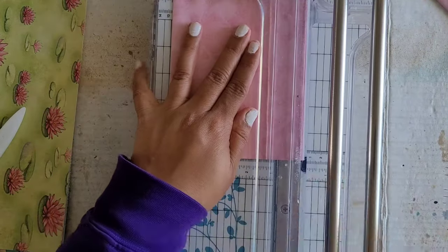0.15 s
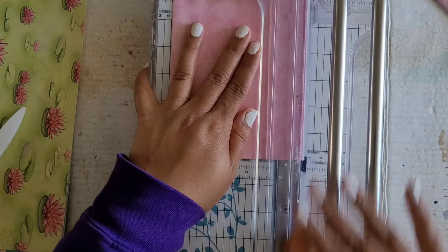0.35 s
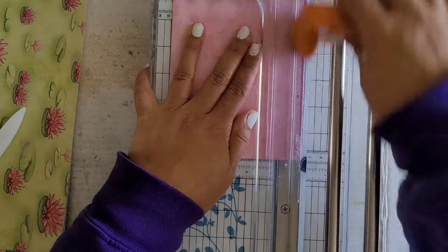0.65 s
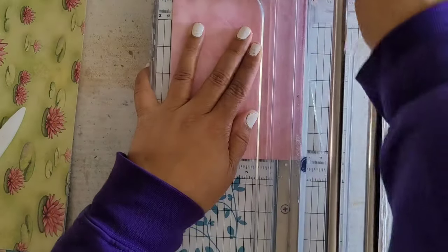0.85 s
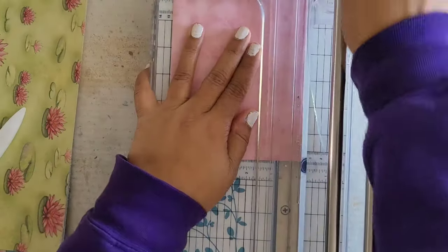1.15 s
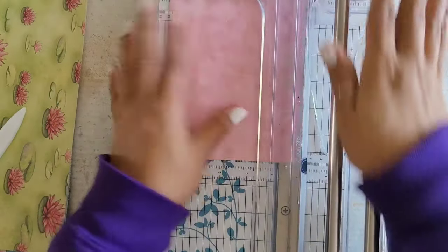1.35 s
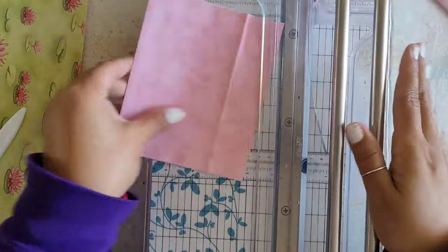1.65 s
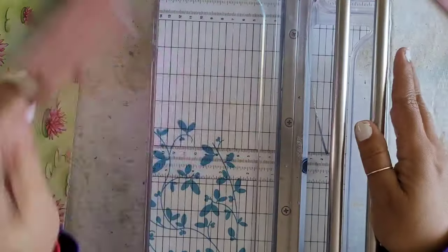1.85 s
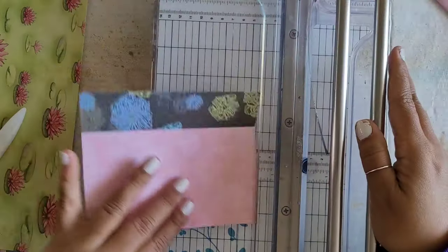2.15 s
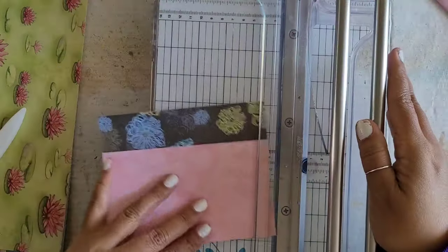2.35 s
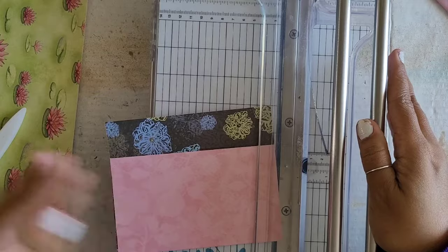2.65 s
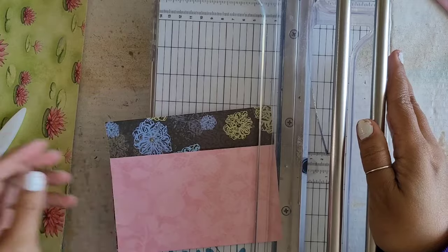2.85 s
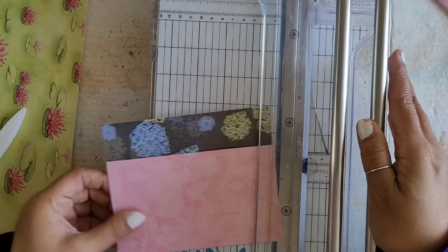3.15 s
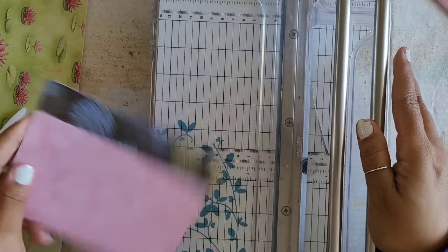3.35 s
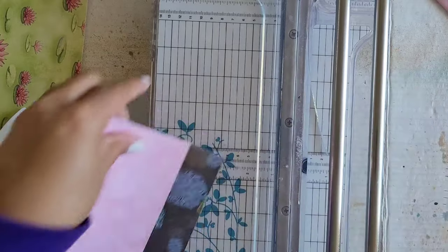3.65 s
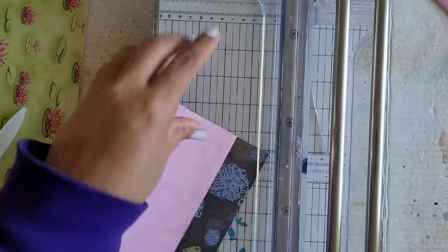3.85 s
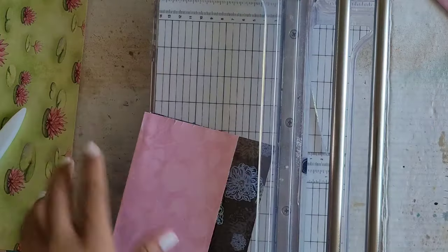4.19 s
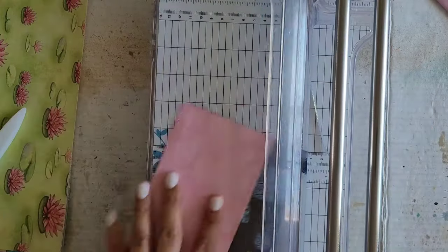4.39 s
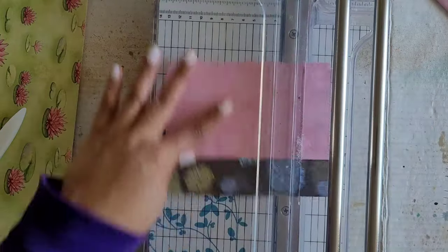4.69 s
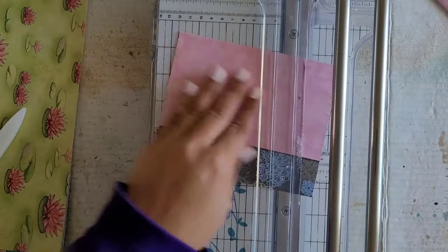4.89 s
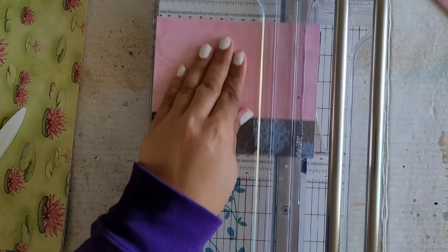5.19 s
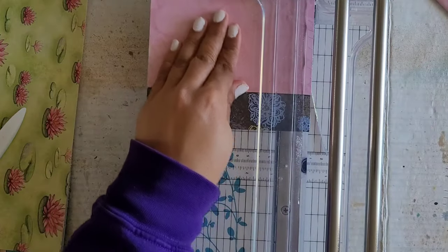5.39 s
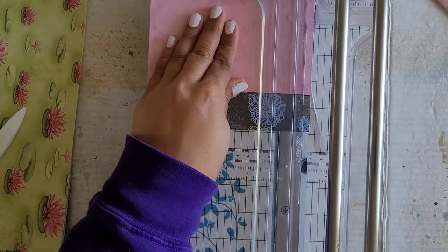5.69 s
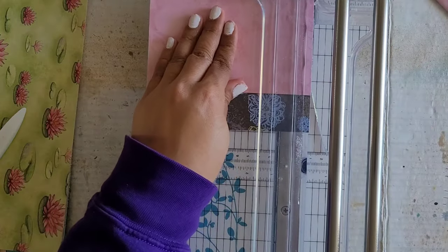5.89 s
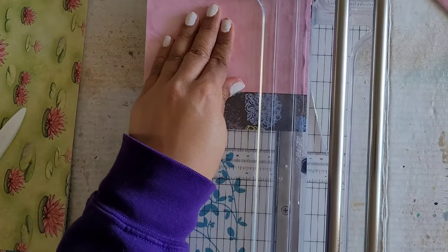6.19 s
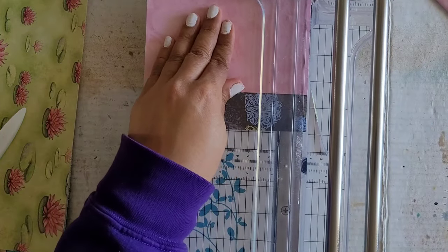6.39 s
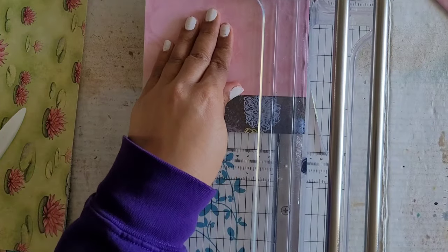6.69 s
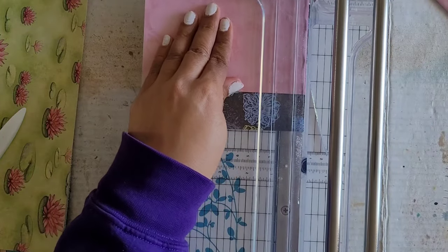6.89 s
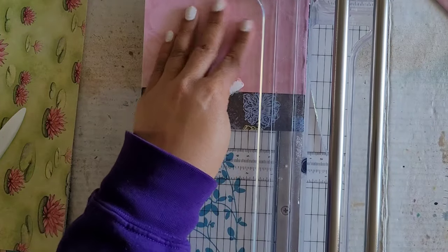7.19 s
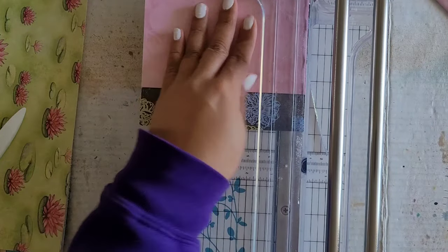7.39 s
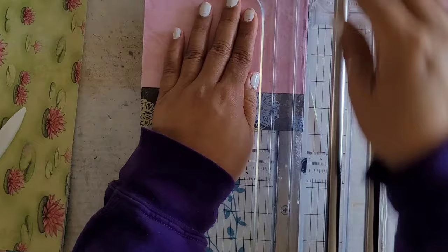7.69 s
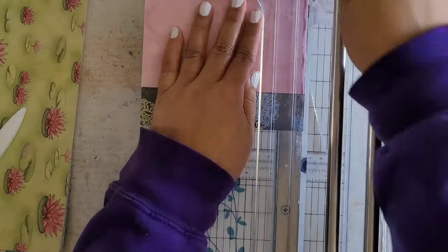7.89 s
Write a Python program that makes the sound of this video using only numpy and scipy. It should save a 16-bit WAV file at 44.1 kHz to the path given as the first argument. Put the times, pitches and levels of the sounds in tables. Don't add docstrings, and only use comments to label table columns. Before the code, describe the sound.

Close on a craft table in a quiet room, a plastic cutter carriage clicks into place, rubs roughly along its rail and knocks the end stop. A stiff sheet then hisses, taps and snaps as hands turn it. Midway a plastic guide bar slaps down loudly with a brief chatter. Soft sliding and sparse ticks follow over a faint appliance hum.

```python
import sys
import numpy as np
from scipy import signal
from scipy.fft import rfft, irfft, next_fast_len
from scipy.io import wavfile

SR = 44100
rng = np.random.default_rng(int(sys.argv[2]) if len(sys.argv) > 2 else 0)


def int16_out(signal):
    q = np.round(np.clip(np.atleast_2d(signal).T, -1, 1) * 32767)
    wavfile.write(sys.argv[1], SR, q.astype(np.int16))


def gain_from_decibels(decibels):
    exponent = np.asarray(decibels, float) / 20
    return 10 ** exponent


N = 354563
FFT_SIZE = next_fast_len(N)
BINS_HZ = np.maximum(np.fft.rfftfreq(FFT_SIZE, 1 / SR), 1)

# pitch in Hz, width in Hz, level in dB.
BOARD_MODES = [(300, 13, -8), (496.8, 98, -2), (650, 55, 0), (860, 130, -6.5)]
# pitch in Hz, width in Hz, level in dB.
CRACK_MODES = [(3786, 390, 6.5), (5400, 1500, -2.5), (6900, 880, -0.5), (8850, 950, -2), (11300, 990, -3.5),
               (12800, 7500, -16.5)]
# pitch in Hz, likeness (1 is the same, 0 is unrelated).
LIKENESS = [(30, .93), (60, 1), (250, 0.85), (600, 0.83), (1200, 0.33), (3000, 0.16), (8000, -0.091),
            (14000, -0.05)]
# pitch in Hz, difference in dB.
LEFT_LEAN = [(200, 0), (1000, -0.5), (3000, 0.5), (10000, -1.5)]


def rms_one(x):
    return x / np.sqrt(np.mean(x ** 2) + 1e-20)


def in_time(rows):
    s, *columns = np.transpose(rows)
    return [np.interp(np.arange(N) / SR, s, c, left=-140, right=-140) for c in columns]


def at_hz(points, hz):
    table_hz, values = np.transpose(points)
    return np.interp(np.log(hz), np.log(table_hz), values)


def drift(rate):
    r = np.exp(-80 * np.pi * rate / SR)
    slow = signal.lfilter([1], [1, -2 * r, r * r], rng.standard_normal(N // 40 + 2002))[2000:]
    return np.interp(np.arange(N) / 40, np.arange(len(slow)), rms_one(slow - slow.mean()))


def resonate(x, modes):
    out = 0
    for k, (hz, width, db) in enumerate(modes):
        r = np.exp(-np.pi * width / SR)
        pole = [1, -2 * r * np.cos(2 * np.pi * hz / SR), r * r]
        ring = signal.lfilter([(1 - r * r) / 2, 0, (r * r - 1) / 2], pole, x)
        out = out + (-1) ** k * gain_from_decibels(db) * ring
    return out


def grit(per_s, spread_db, clump_db):
    sizes = gain_from_decibels(spread_db * np.minimum(rng.exponential(1, (2, N)), 4)) * rng.choice([-1, 1], (2, N))
    happens = rng.random((2, N)) < per_s / SR
    return sizes * happens * gain_from_decibels(clump_db * drift(21)) + 1e-9


def tinted(pair, spectrum, low_hz, high_hz):
    skirt = 1 / np.sqrt((1 + (low_hz / BINS_HZ) ** 6) * (1 + (BINS_HZ / high_hz) ** 6))
    coloured = rfft(pair, FFT_SIZE) * gain_from_decibels(at_hz(spectrum, BINS_HZ)) * skirt
    return rms_one(irfft(coloured, FFT_SIZE)[:, :N])


def likeness_and_lean(hz):
    return np.clip(at_hz(LIKENESS, hz), -1, 1), at_hz(LEFT_LEAN, hz) / 2


def spread(pair):
    alike, lean = likeness_and_lean(BINS_HZ)
    mid, side = rfft(pair, FFT_SIZE) * np.sqrt([1 + alike, 1 - alike])
    return irfft([(mid + side) * gain_from_decibels(lean), (mid - side) * gain_from_decibels(-lean)], FFT_SIZE)[:, :N] / np.sqrt(2)


def strike(modes, rise_s, t60, noise):
    t = np.arange(noise.shape[1]) / SR
    force = (1 - np.exp(-t / rise_s)) ** 2 * (gain_from_decibels(-60 * t / t60) + 0.82 * np.exp(-t / 0.001396))
    rings = resonate(noise * force, modes)
    return rings / np.abs(rings).max(axis=1, keepdims=True)


def add(out, s, sound):
    i = round(s * SR)
    out[:, i:i + sound.shape[1]] += sound[:, :N - i]


def background():
    # pitch in Hz, level in dB per Hz.
    air_colour = [(20, -31.5), (40, -8), (55, 2), (80, -4.5), (200, 2), (310, -8.5), (420, -9.5),
                  (630, -24.5), (1350, -20.5), (1600, -44.5), (2500, -50.5), (3200, -34.5), (5000, -52),
                  (9000, -70)]
    # time in seconds, level in dB.
    air_fade = [(0, 3), (1.5, 2), (3, -2.5), (8.04, -2)]
    # pitch in Hz, width in Hz, level in dB (rms).
    hum_tones = [(79.94, 6.5, -60.5), (119.7, 0.67, -61), (160, 6.8, -71), (3200, 430, -91),
                 (6360, 270, -85.5)]
    whine_hz, whine_db = 1125, -70.5
    air = gain_from_decibels(-54 + in_time(air_fade)[0]) * tinted(rng.standard_normal((2, N)), air_colour, 7.9, 17000)
    hum = 0
    for hz, width, db in hum_tones:
        hum = hum + gain_from_decibels(db) * rms_one(resonate(rng.standard_normal((2, N)), [(hz, width, 0)]))
    turn = 2 * np.pi * np.cumsum(whine_hz + 1.5 * drift(10.0)) / SR
    whine = np.sqrt(2) * gain_from_decibels(whine_db + 1.6 * drift(6)) * np.array([np.sin(turn), np.cos(turn)])
    return air + hum + whine


def bands(pair, size):
    limits_hz = 28 * 2 ** np.arange(0, 9.3, 0.4)
    for low, high in zip(limits_hz, limits_hz[1:]):
        hz = np.sqrt(low * high)
        band_pass = signal.butter(2, [low, high], "band", fs=SR, output="sos")
        mid, side = signal.sosfilt(band_pass, pair())[:, -size:]
        alike, lean = likeness_and_lean(hz)
        both = np.sqrt(1 + alike) * mid + np.sqrt(1 - alike) * side * [[1], [-1]]
        yield hz, both * gain_from_decibels(np.array([[lean], [-lean]]))


def room(x):
    # pitch in Hz, seconds to fall 60 dB.
    decay = [(125, 0.37), (600, 0.21), (2500, 0.36), (5000, 0.21), (12000, 0.39)]
    # pitch in Hz, level in dB.
    tilt = [(300, 0), (1500, 0), (5000, -3), (8500, -10), (12000, -14)]
    t = np.arange(SR // 2) / SR
    tail = 0
    for hz, band in bands(lambda: rng.standard_normal((2, SR)), SR // 2):
        tail = tail + band * gain_from_decibels(at_hz(tilt, hz) - 60 * t / at_hz(decay, hz))
    tail = tail * (1 - np.exp(-t / 0.0018))
    tail = tail / np.sqrt((tail ** 2).sum(axis=1).mean())
    return signal.fftconvolve(x[None], tail, axes=1)[:, :N]


def moves(rows, rise_db_per_s, fall_db_per_s):
    t, out = np.arange(0, N, 32) / SR, 0
    for s, hold_s, db, drag_db, board_db in rows:
        shape_db = -rise_db_per_s * np.maximum(s - t, 0) - fall_db_per_s * np.maximum(t - s - hold_s, 0)
        out = out + gain_from_decibels(shape_db + db + np.array([[0], [drag_db], [board_db]])) ** 2
    return np.repeat(out, 32, axis=1)[:, :N]


def paper():
    # start in seconds, hold in seconds, hiss in dB, drag and board in dB above hiss.
    slow_slides = [(1.45, 0.14, -59, 6.5, 2.5), (2.27, 0.14, -66, 6.5, -8), (2.45, 0.15, -58, 3, -7),
                   (2.55, 0.15, -64, -14, -18), (2.95, 0.41, -100, 28.5, 23.5), (3.51, 0.1, -65, 6, 2),
                   (3.91, 0.021, -65.5, -1, 2), (4.07, 0.13, -68.5, -7, 7.5), (4.24, 0.021, -90, 20, 20),
                   (4.7, 0.21, -49, -7, -13.5), (4.88, 0.078, -60.5, 26, -11.5), (5.22, 0.31, -59.5, 6, -4),
                   (6.06, .015, -76, 9, 6), (7.68, 0.11, -79.5, 18, -6), (7.84, 0.13, -74, 11.5, 11)]
    # start in seconds, hold in seconds, hiss in dB, drag and board in dB above hiss.
    quick_jerks = [(1.33, 0.06, -67, 11, 16), (1.63, 0.13, -66.5, 12.5, 7.5), (1.73, 0.15, -56, -10, 2),
                   (1.9, 0.064, -54, -22, -18), (1.99, 0.1, -60.5, -2, -18), (3.25, 0.017, -72, -8, 4),
                   (3.31, 0.066, -61.5, 4.5, 3), (3.42, 0.019, -64, -22, -10), (3.64, 0.082, -71, -5, -3),
                   (3.72, 0.083, -61, -25, -2), (4.435, 0.034, -52.5, 2.5, -1), (4.49, 0.047, -59, 6, -7),
                   (4.55, 0.08, -46.5, 1, -15), (5.1, 0.026, -59.5, 7, 8), (5.705, 0.016, -86, 11, 21.5),
                   (6.25, 0.013, -68.5, 8.5, -7.5), (6.76, 0.013, -74, 13.5, 5.5),
                   (6.92, 0.0077, -63, 3.5, -1), (7.1, .012, -84, 9, 14.5), (7.3, 0.059, -61.5, 0, -16),
                   (7.5, 0.035, -54, -9.5, -15), (7.56, 0.039, -61, 8, 10.5)]
    # hiss, drag and board in dB.
    resting_db = [-104, -91, -69.5]
    bend_zones = [1700, 2400, 3300, 4400, 5900, 7800, 10500, 14000]
    # pitch in Hz, level in dB per Hz.
    sheet_colour = [(710, -32.5), (1200, 2.5), (1850, -5), (2680, -8.5), (2830, -5.5), (3590, -7.5),
                    (6440, -10.5), (8000, -11), (11900, -10), (15200, -15.5), (16000, -16.5)]
    power = moves(slow_slides, rise_db_per_s=135.5, fall_db_per_s=214.5)
    power = power + moves(quick_jerks, rise_db_per_s=748.5, fall_db_per_s=327.5)
    handled = np.arange(N) / SR > quick_jerks[0][0]
    hiss_gain, drag_gain, board_gain = np.sqrt(power + handled * gain_from_decibels(resting_db)[:, None] ** 2)
    catches = grit(6000, spread_db=1.0, clump_db=0.8)
    fibres = 0
    for hz in bend_zones:
        fibres = fibres + gain_from_decibels(2.5 * drift(18)) * resonate(catches, [(hz, hz * 0.3, 0)]) / np.sqrt(hz)
    hiss = hiss_gain * gain_from_decibels(-0.17) * tinted(fibres, sheet_colour, 4100, 16500)
    drag = drag_gain * gain_from_decibels(-9.5) * tinted(fibres, sheet_colour, 2800, 4500)
    bumps = grit(900, spread_db=3.5, clump_db=4.0)
    return hiss + drag + board_gain * gain_from_decibels(-1.5) * rms_one(resonate(bumps, BOARD_MODES))


def snaps():
    # time in seconds, peak in dB, pitch in Hz.
    kinks = [(1.314, -46, 4930), (1.3323, -40, 4140), (1.365, -41, 1540), (1.443, -37, 3800),
             (1.556, -35, 2700), (1.7145, -26, 2500), (1.7902, -38, 6400), (1.8127, -40, 2500),
             (1.9394, -41, 4800), (1.9633, -37.5, 3000), (3.3136, -66, 3500), (3.36, -34.5, 4080),
             (3.3689, -42, 4100), (3.5021, -44, 3000), (3.547, -44, 2800), (3.5929, -50, 2560),
             (3.7574, -46, 2000), (4.1847, -23.5, 3670), (4.425, -36, 4000), (4.5473, -40, 4020),
             (5.103, -32, 2750), (5.2085, -56, 4000), (5.461, -42, 3000), (6.246, -56, 4000),
             (6.914, -48.5, 4020), (7.284, -51.5, 4020), (7.2996, -53, 4040), (7.4748, -48, 3200),
             (7.519, -50, 2800), (7.588, -35, 2810), (7.608, -49, 3450), (7.9376, -48.5, 4300),
             (7.9502, -46, 2500), (7.9611, -37, 2187), (7.9855, -44, 3100), (0.0211, -36.5, 2340),
             (0.1131, -44, 2500), (0.137, -43, 2970), (0.2014, -38, 5000), (0.2206, -32, 1600),
             (0.3958, -27, 1400), (0.6634, -18, 1990), (2.1389, -31, 890), (2.437, -46, 5500),
             (2.566, -27.5, 6100), (2.575, -26.5, 2960), (4.8402, -14.5, 800), (5.125, -50, 2800),
             (5.5185, -37, 1200), (5.705, -56, 1397)]
    buzz_db, buzz_t60_s = -5, 0.012
    out, t = np.zeros((2, N)), np.arange(SR // 30) / SR
    for s, db, hz in kinks:
        noise = rng.standard_normal((2, len(t)))
        kink = (t == 0) * np.array([[-1], [0.4 * noise[1, 1]]])
        buzz = gain_from_decibels(buzz_db - 60 * t / buzz_t60_s) * noise
        rings = resonate(kink, [(hz * 0.67, hz * 1.2, 0)])
        rings = rings + resonate(buzz, [(hz, hz * 0.4, 0), (hz * 0.5, hz * 0.5, -4.0)])
        add(out, s, gain_from_decibels(db) * rings / np.abs(rings[0]).max())
    return out


def taps(touches, kind, middle_modes, bright_modes):
    knock_above_db, middling_t60_s, shorter_per_db = kind
    out = np.zeros((2, N))
    for s, db, hz, hardness_db in touches:
        noise = rng.standard_normal((3, 2, SR // 8))
        knock_db = knock_above_db + 0.47 * hardness_db
        t60 = middling_t60_s * gain_from_decibels(-shorter_per_db * (db + 40))
        rise_s = 0.0003 * gain_from_decibels(-0.52 * hardness_db)
        dull_noise = signal.lfilter(*signal.butter(2, hz * 1.6, fs=SR), noise[0])
        thud_modes = [(hz, 130, 0), (hz * 1.3, 220, -6), (hz * 0.68, 120, -7)]
        thud = strike(thud_modes, rise_s, t60 * 0.76, dull_noise)
        knock = strike(middle_modes, rise_s * 0.84, t60 * 1.13, noise[1])
        crack = strike(bright_modes, 0.0002, t60 * 0.3, noise[2])
        touch = thud + gain_from_decibels(knock_db + 3) * knock + gain_from_decibels(hardness_db + 1.5) * crack
        add(out, s - 0.001, gain_from_decibels(db + 1.0) * touch)
    return out


def hands():
    # pitch in Hz, width in Hz, level in dB.
    knock_modes = [(1187, 270, 7), (2207, 430, 1.5), (2610, 1170, -4.5), (3240, 210, -1)]
    # time in seconds, thud in dB, thud pitch in Hz, hardness in dB.
    finger_pads = [(1.752, -38, 590, -14), (2.035, -40.5, 600, 1), (2.294, -33.5, 623, -43),
                   (2.566, -39.5, 517, 10), (2.574, -23.5, 610, -8), (3.24, -50, 261, -4.5),
                   (3.374, -37, 600, -21), (3.648, -44.5, 510, -11), (6.277, -40, 651, -19.5),
                   (7.086, -51, 597, -33), (7.551, -43, 800, -15)]
    # time in seconds, thud in dB, thud pitch in Hz, hardness in dB.
    paper_edges = [(1.324, -41.5, 651, -6), (1.441, -42, 573, -1), (1.6, -45.5, 567, -8),
                   (1.844, -46, 550, -25), (1.892, -31.5, 660, -28), (1.962, -36, 616, -2),
                   (2.137, -28.5, 284, -15), (2.724, -41.5, 710, 2), (3.591, -31, 770, -19),
                   (4.113, -50, 470, -16), (4.178, -45.5, 250, 3.5), (4.424, -49, 660, 5),
                   (4.8, -37, 596, -23.5), (5.455, -70, 654, 22), (5.96, -44, 568, -2),
                   (6.456, -41, 547, 1), (6.934, -41.5, 552, -14), (7.455, -52, 682, -8.5),
                   (7.505, -40, 590, -37)]
    # time in seconds, thud in dB, thud pitch in Hz, hardness in dB.
    fingernails = [(1.384, -45, 587, -19), (1.417, -40, 520, -35), (1.553, -53.5, 250, -25),
                   (1.695, -62, 538, 16), (1.711, -36.5, 1170, -14.5), (1.792, -39.5, 620, -18),
                   (1.814, -46, 580, -9), (3.762, -48, 650, -41), (4.032, -49.5, 1520, -24),
                   (4.036, -33, 580, -48), (4.181, -35.5, 645, -29), (4.54, -47, 563, -19),
                   (5.112, -39.5, 650, -34), (5.517, -30.5, 650, -31.5), (7.588, -42, 1270, -23),
                   (7.594, -43.5, 1310, -11)]
    # time in seconds, thud in
    # dB, thud pitch in Hz, hardness in dB.
    flat_hand = [(2.138, -27.5, 680, -9.5), (2.147, -36, 404, -55), (2.579, -34, 830, -16),
                 (3.368, -41, 926, -3.5), (3.592, -39.5, 360, -13), (4.82, -28.5, 680, -50.5),
                 (6.938, -44, 954, -22)]
    out = taps(finger_pads, (-5, 0.056, 0.52), knock_modes, CRACK_MODES)
    out += taps(paper_edges, (-0.6, 0.049, 0.92), knock_modes, CRACK_MODES)
    out += taps(fingernails, (7, 0.034, 0.79), knock_modes, CRACK_MODES)
    out += taps(flat_hand, (-0.95, 0.068, 0.04886), knock_modes, CRACK_MODES)
    return out


def guide_bar():
    # time in seconds, blow in dB, brightness in dB, fall time in seconds.
    blows = [
        (4.8347, -7, 1.5, 0.014),
        (4.8362, -9, -8, 0.0036),
        (4.8408, -11, -12, 0.017),
        (4.848, -14.5, -10, 0.058),
        (4.8547, -16, -7, 0.29),
        (4.872, -15, -8, 0.04),
    ]
    # pitch in Hz, width in Hz, level in dB.
    bar_modes = [(250, 120, -2.5), (474, 140, -1.5), (651, 88, 9.5), (800, 60, 11.5), (1200, 200, 2),
                 (1870, 470, 0.5), (2670, 4500, -6)]
    out = np.zeros((2, N))
    for s, db, bright_db, t60 in blows:
        noise = rng.standard_normal((2, 2, SR // 4))
        body = strike(bar_modes, 0.00074, t60, noise[0])
        crack = strike(CRACK_MODES, 0.00081, t60 * 0.58, noise[1])
        add(out, s - 0.001, gain_from_decibels(db) * (body + gain_from_decibels(bright_db) * crack))
    mid, side = out
    return np.array([mid, 0.5 * side - 0.35 * mid])


def carriage_clicks():
    # time in seconds, thud in dB, thud pitch in Hz, hardness in dB.
    clicks = [
        (0.021, -63, 250, -4),
        (0.113, -51, 715, -19.5),
        (0.139, -41.5, 650, -14),
        (0.202, -37, 582, -17),
        (0.311, -25, 530, -11.5),
        (0.398, -44.5, 675, 2),
        (0.968, -23, 665, 0),
        (1.096, -26.5, 680, 6.5),
        (7.95, -67, 300, 6),
        (7.961, -52, 265.6, -11),
    ]
    # pitch in Hz, width in Hz, level in dB.
    seat_modes = [(1354, 270, 2), (1596, 240, -2.5), (1810, 44, 1.5), (2245, 77, -20), (2860, 670, -16)]
    # pitch in Hz, width in Hz, level in dB.
    latch_modes = [(3064, 460, -14), (4270, 340, 6.5), (5360, 130, 3.5), (6330, 860, -1), (8800, 1800, -13),
                   (12000, 1100, -12)]
    return taps(clicks, (4.06, 0.045, 0.018), seat_modes, latch_modes)


def jolts():
    # time in seconds, then rail, holder and board in dB above the steady rub.
    releases = [(0.41, -3, -4, -9), (0.434, -14.5, 7, -9), (0.491, 10, -1.5, -9), (0.508, 4, 9, -13),
                (0.53, 8, -2, -10), (0.555, 4, 5, -10.5), (0.583, -1, 3, -6.5), (0.6, -4, 5, -3.5),
                (0.638, -2, -7.5, 0), (0.657, 8, -3, -10), (0.697, 6, 6, 12.5), (0.715, -4, -6, -2),
                (0.762, 10, -11, 13.5), (0.784, -4, -9, -3), (0.811, 7.5, -3.5, -13.5), (0.852, 1, -1, -1),
                (0.26, 10, -3, -6), (0.284, 2, -1, -6), (0.325, 2, -9, 5), (0.982, -9, 7, -1),
                (1.048, 9, -16, -11), (1.108, -3, 9, 15), (7.957, -5, 10, -11), (7.985, 0, 1, -9),
                (8.02, 2, -5, -9)]
    t, out = np.arange(SR // 8) / SR, np.ones((4, N))
    shape = (1 - np.exp(-t / 0.0052)) * gain_from_decibels(-60 * t / 0.068)
    for s, rail_db, holder_db, board_db in releases:
        blade_db = holder_db - 3.5
        add(out, s - 0.001, gain_from_decibels(np.array([[rail_db], [holder_db], [board_db], [blade_db]])) * shape)
    return out


def shift_pitch(pair, ratio):
    place = np.cumsum(ratio) % (N - 1)
    return np.array([np.interp(place, np.arange(N), x) for x in pair])


def carriage():
    # pitch in Hz, width in Hz, level in dB.
    rail_modes = [(1060, 83, 1), (1206, 410, 3), (1434, 160, 8), (1828, 130, -1), (2330, 650, -10)]
    # pitch in Hz, width in Hz, level in dB.
    holder_modes = [(2742, 350, -4.5), (3020, 470, -0.5), (3850, 670, 3.5), (4200, 500, 2),
                    (5013, 360, -7.5)]
    # pitch in Hz, width in Hz, level in dB.
    blade_modes = [(5230, 800, -4.5), (6540, 700, -1), (7300, 1300, -1.5), (9200, 3600, -1.5),
                   (12020, 10000, -5.5), (14700, 1700, -7.5)]
    # time in seconds, speed as dB, pressure on the board in dB.
    seating = [(0.0, -68, -21), (0.11, -65, -7), (0.14, -45.5, 5), (0.17, -55.5, 2), (0.23, -50, -2),
               (0.282, -42.5, -1.5), (0.38, -44.5, -5), (0.405, -36, -11)]
    # time in seconds, speed as dB, pressure on the board in dB.
    cut = [(0.443, -31.5, -11), (0.477, -37.5, -13.5), (0.501, -33, -20), (0.575, -31.5, -11.5),
           (0.593, -31.5, 2.5), (0.755, -35.5, -3), (0.78, -40, 5.5), (0.849, -34.5, 1), (0.885, -46, -0.5)]
    # time in seconds, speed as dB, pressure on the board in dB.
    coast = [(0.93, -46, 1), (1.03, -48, 0), (1.07, -43.5, -15), (1.159, -62, -8), (1.22, -73, -8),
             (1.3, -58.5, -18)]
    # time in seconds, speed as dB, pressure on the board in dB.
    restart = [(7.94, -81, -22), (7.955, -66.5, -34), (7.99, -59.5, -33), (8.04, -66, -35)]
    # time in seconds, rail and holder pitch ratio.
    travel = [(0.4, 1, 1.04), (0.49, 0.94, 1.04), (0.575, 1.11, 1.0), (0.63, 1.01, .95),
              (0.673, 1.07, 0.87), (0.722, .93, 1.04), (0.789, .84, .95), (0.849, 0.97, 0.99),
              (0.919, 1.02, .9)]
    # level in dB above speed, share of the pressure.
    answers = [
        (0.5, 0.08),
        (-1.5, -0.12),
        (-1, 0.98),
        (-2, 0.088),
    ]
    catches = grit(3000, spread_db=1.5, clump_db=0.14)
    parts = []
    for modes in (rail_modes, holder_modes, BOARD_MODES, blade_modes):
        parts.append(resonate(catches * rng.choice([-1, 1], N), modes))
    s, *ratios = np.transpose(travel)
    for k, ratio in enumerate(ratios):
        parts[k] = shift_pitch(parts[k], np.interp(np.arange(N) / SR, s, ratio))
    speed_db, pressure_db = np.maximum(in_time(seating + cut + coast), in_time(restart))
    out = 0
    for (db, share), part, jolt in zip(answers, parts, jolts()):
        rocking_db = 1.33 * drift(25)
        gain = gain_from_decibels(speed_db + db - 4.5 + share * pressure_db + rocking_db)
        out = out + gain * jolt * rms_one(part)
    return out


def scene():
    air = background()
    rubbing = paper() + carriage()
    touches = snaps() + hands() + carriage_clicks()
    blows = touches * [[1], [0.6]] + guide_bar()
    echoes = gain_from_decibels(-13) * room(blows[0] + 0.76 * rubbing[0])
    return spread(blows + rubbing + air) + echoes


def band_limit(x):
    return signal.sosfilt(signal.butter(12, 16640, fs=SR, output="sos"), x)


def record(dry):
    # pitch in Hz, level in dB.
    mic_colour = [(2000, 1), (3700, 1.5), (5200, -0.5), (6500, 4.5), (7600, -2), (9200, -1.5), (12000, 4),
                  (15600, 1.5), (16300, -24)]
    heard = irfft(rfft(dry, FFT_SIZE) * gain_from_decibels(at_hz(mic_colour, BINS_HZ)), FFT_SIZE)[:, :N]
    heard = 1.3 * np.tanh(heard / 1.3)
    return band_limit(heard)


dry = scene()
out = record(dry)
int16_out(out)
```